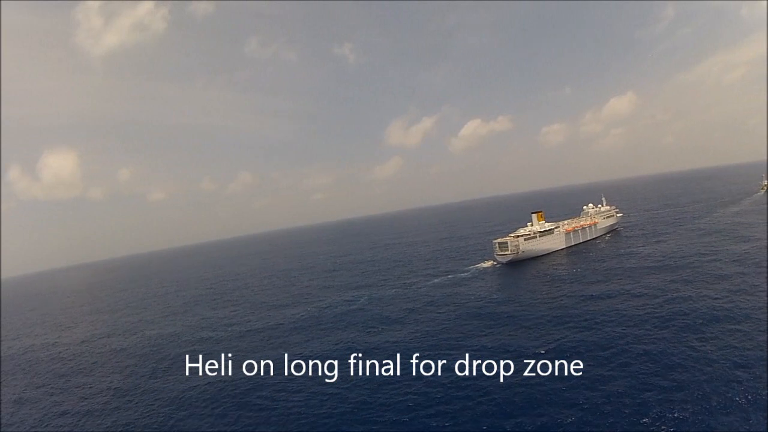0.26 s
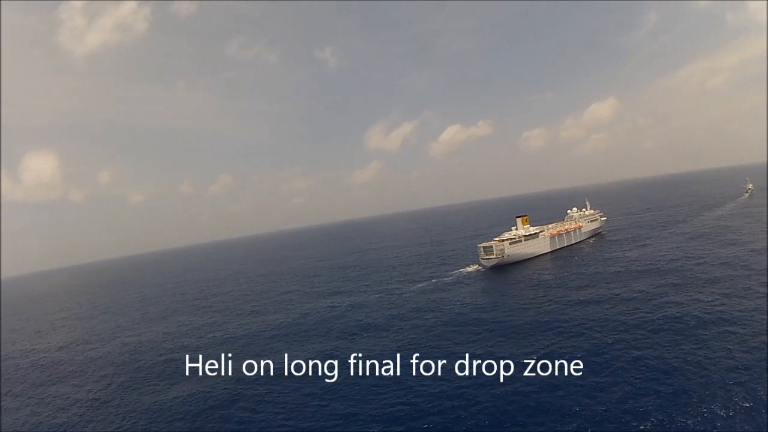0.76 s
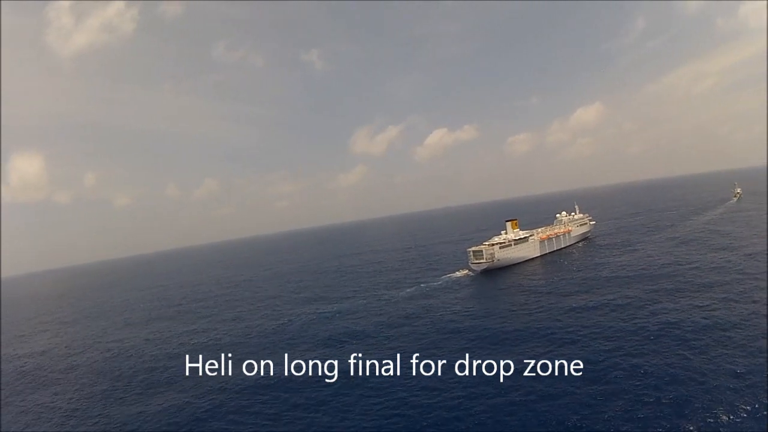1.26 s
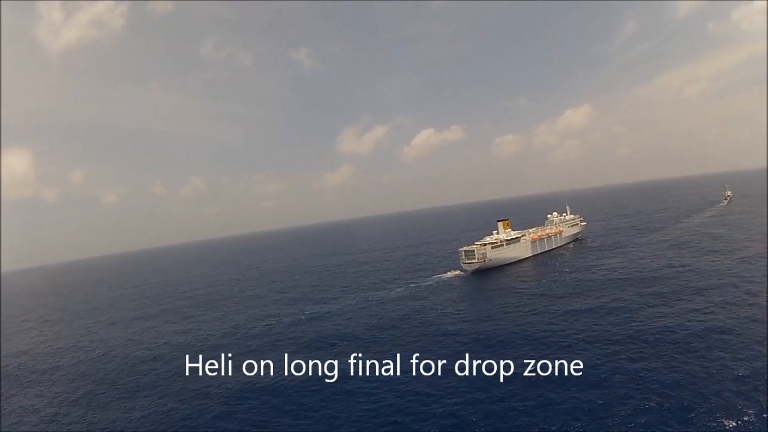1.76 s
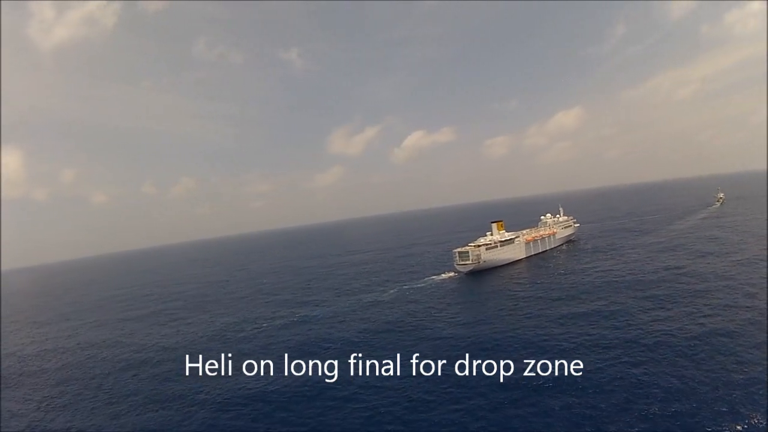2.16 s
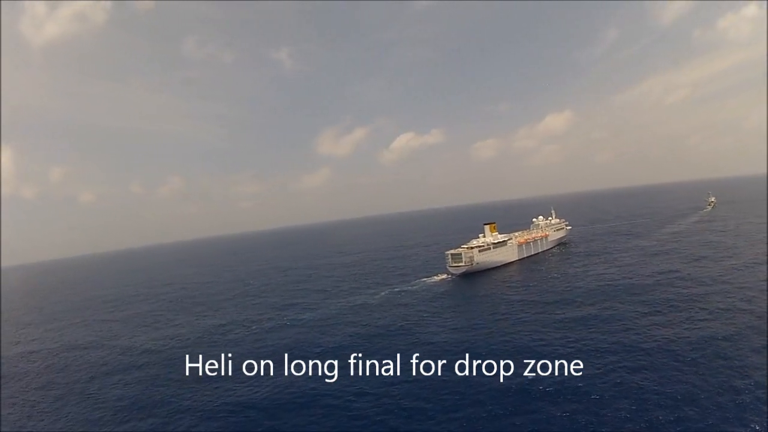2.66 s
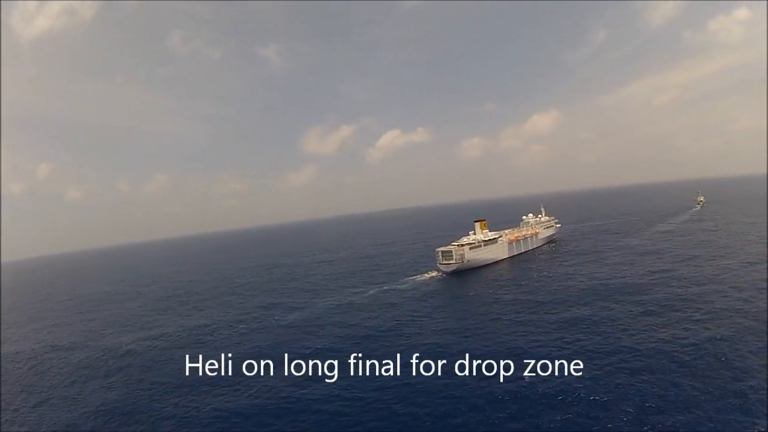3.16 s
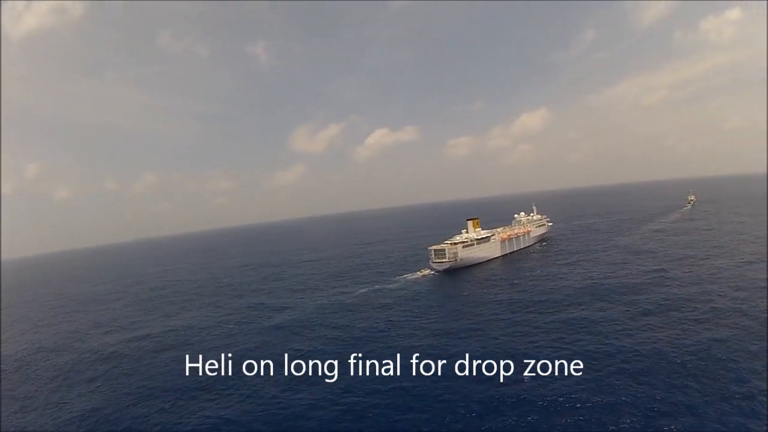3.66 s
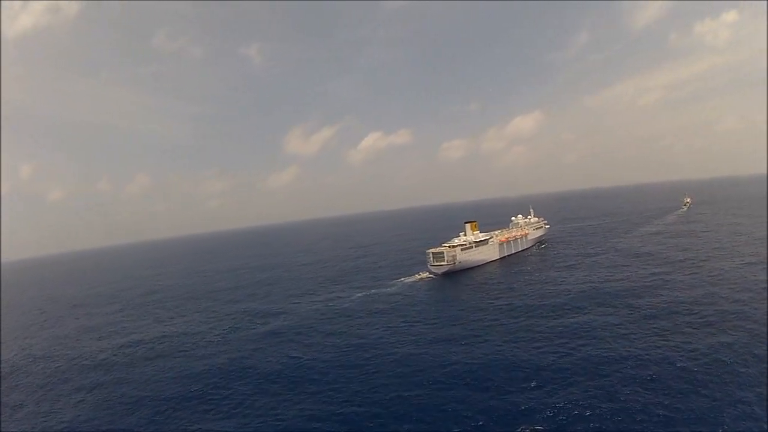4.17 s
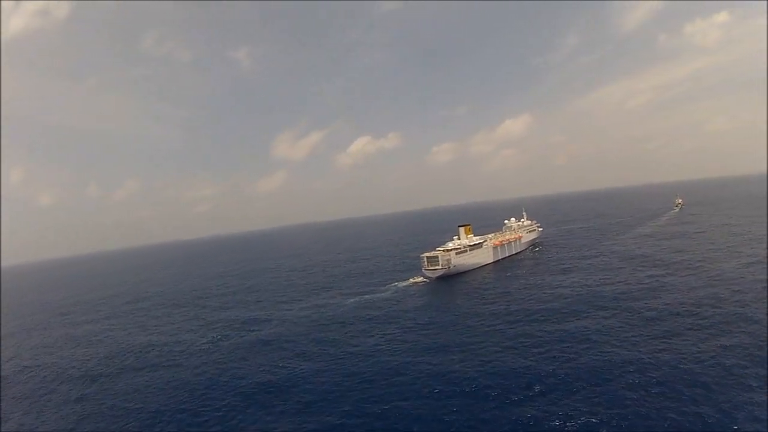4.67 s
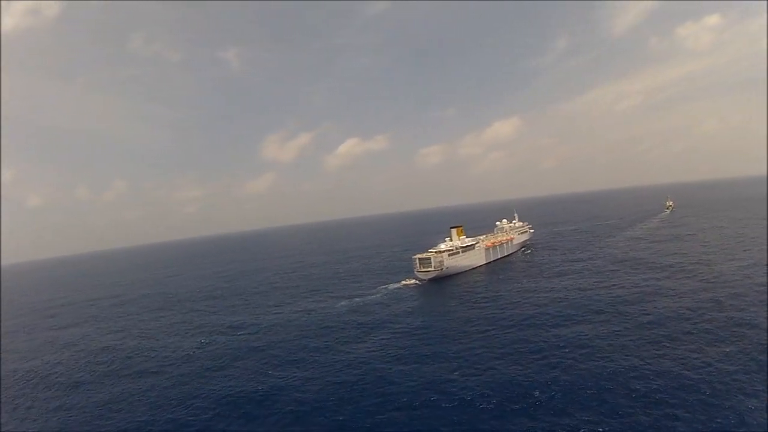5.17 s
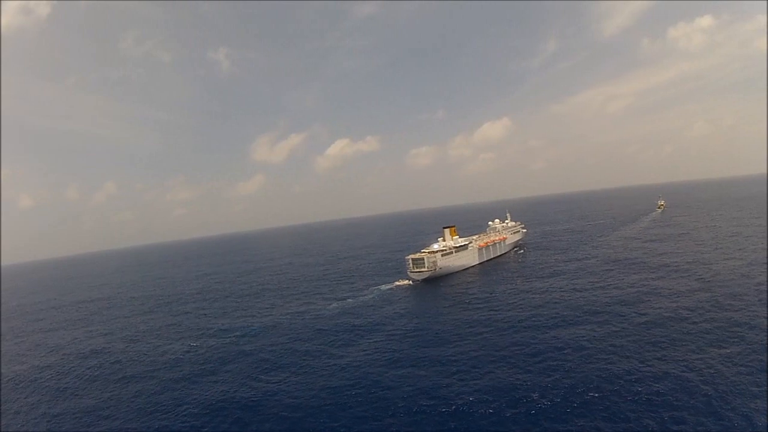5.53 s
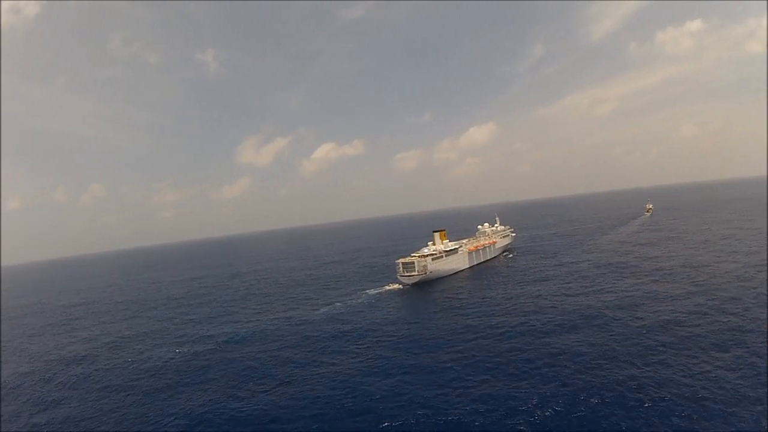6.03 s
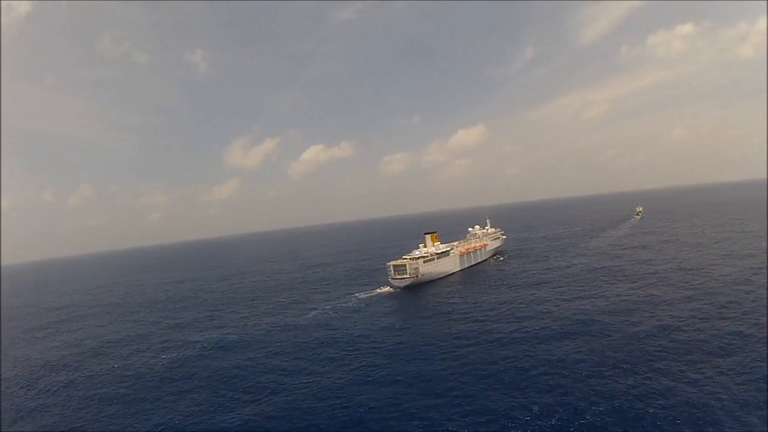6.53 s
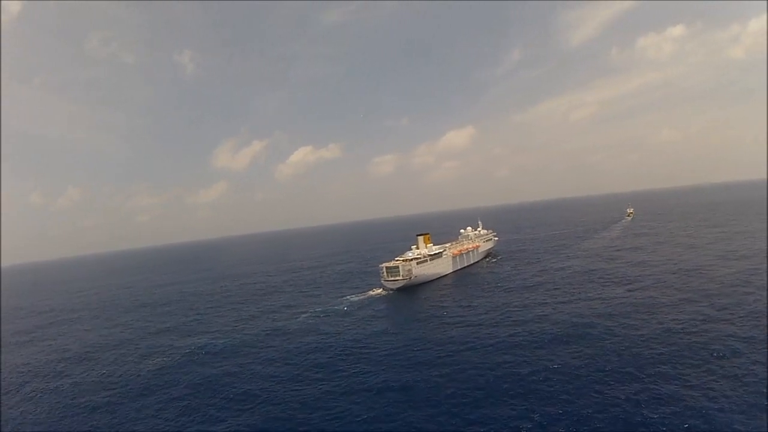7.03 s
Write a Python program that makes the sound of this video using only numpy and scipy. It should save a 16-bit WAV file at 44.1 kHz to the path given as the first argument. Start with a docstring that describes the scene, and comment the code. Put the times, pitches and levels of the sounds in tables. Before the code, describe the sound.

Continuous helicopter cabin noise: a dominant low hum with rapid rotor thudding, airframe vibration and rumbling buffeting. Over it lies a steady rush of air and turbine, chopped by quick, mostly rising swishes, with very faint gear tones inside. The boom wavers early, swells toward the middle and is strongest in the last second or so. Close, lo-fi mono pickup on board, no sea sounds.

```python
"""A three-bladed helicopter rotor thumps the cabin about 20 times a second, heard from inside in cruise over the sea.
The cabin booms on the fourth harmonic of the blade passages, made from wandering tones locked to the shaft.
Around it, shaped noise makes the buffeting and the roar of air and turbine, with mostly rising blade swishes.
Drive train tones hum faintly. A low-rate sample hold mirrors the whole mix into a gritty treble."""
import sys
import numpy as np
from scipy import signal
from scipy.fft import rfft, irfft, next_fast_len
from scipy.io import wavfile
from scipy.ndimage import map_coordinates

SR = 44100
rng = np.random.default_rng(int(sys.argv[2]) if len(sys.argv) > 2 else 0)


def unload_audio(sound):
    """Save the sound as a 16-bit wav file, at the path given as the first command line argument."""
    columns = np.transpose(np.atleast_2d(sound))
    # keep every value between -1 and 1, then stretch to whole-number steps
    steps = np.round(np.clip(columns, -1, 1) * 32767)
    wavfile.write(sys.argv[1], SR, steps.astype(np.int16))


N = 321930  # length in samples

# Drive train tones: pitch_hz, level_db
GEAR_TONES = [(49.6, -54), (253, -56), (338, -51), (730, -57.5), (1114, -63), (1697, -59.5)]
# Course of the air noise, before each layer's fixed trim: start_s, buffeting_db, rush_db
FLIGHT_LEVELS = [(0, -40.5, -35.6), (.7, -38, -36), (2, -39, -35), (2.75, -38, -34.3), (3.8, -38.5, -34.5),
                 (4.8, -39.5, -35), (5.8, -38, -35), (7.3, -37.5, -35)]
# Relative spectrum of the low cabin turbulence: pitch_hz, density_db (per Hz)
BUFFET_SPECTRUM = [(12, -31), (32, -25), (50, -14), (66, -4.5), (80, -5), (93, -6), (115, -10.5),
                   (150, -16), (200, -15.5), (240, -19), (270, -23.5), (325, -17), (400, -25), (600, -50)]
# Relative spectrum of the air and turbine roar: pitch_hz, density_db (per Hz)
RUSH_SPECTRUM = [(150, -26), (400, -9.5), (550, -0.5), (800, -1), (1050, -8), (1350, -7), (1600, -1),
                 (2200, -3.5), (2580, -3), (2950, -11), (3650, -13.5), (4400, -21), (5000, -27),
                 (5600, -26.5)]
# Cabin peaks and hollows in the roar: centre_hz, half_width_hz (to 1/e), change_db
CABIN_COLOUR = [(614, 26, 1), (653, 25.5, -7), (785, 61, 3), (1207, 70, 3), (1883, 63, -2.5), (2160, 95, 4),
                (2698, 68, -5), (3216, 225, -5.5)]
# Swishes in a blade passage, before blade bite and band levelling: moment (0-1 passage),
# half_length (passages, to 1/e), centre_hz, climb (octaves per passage), half_width (octaves, to 1/e), swell_db
BLADE_SWISHES = [(0.52, 0.4, 1515, 0.029, 0.18, 7.5), (0.85, 0.37, 2100, 0.44, 0.21, 10),
                 (0.97, 0.15, 1030, 0.33, 0.27, 6.5), (0.6, 0.13, 355, .8, 0.43, 13),
                 (0.7, 0.27, 4060, -0.51, 0.45, 7), (0.58, 0.27, 4720, 0.49, 0.081, 5),
                 (0.4, 0.03, 2570, 0, 0.33, 6.5)]
# Blade passage rate: start_s, rate_hz
PASSAGE_RATE = [(0, 20.323), (1, 20.31), (2, 20.27), (3, 20.258), (3.6, 20.238), (4.5, 20.296),
                (5.2, 20.266), (6, 20.257), (7.3, 20.293)]
# Slow course of the cabin boom: start_s, level_db
BOOM_COURSE = [(0, -19.5), (.45, -18), (1.15, -21.5), (2.75, -16.5), (4.1, -14.1), (5.25, -16),
               (5.82, -14.5), (5.98, -11.3), (7.3, -11.5)]
# Brief dips and swells of the boom: centre_s, change_db, half_length_s (to 1/e)
BOOM_SWINGS = [(0.584, -11, 0.042), (.81, -7.5, 0.043), (0.973, -14, .035), (1.36, -6, 0.13),
               (2.102, -12, 0.036), (3.4, 4, 0.034), (4.325, -4, 0.057), (5.095, -5, 0.04)]
# Blade pressure wave at cruise boom: harmonic (x passage rate), level_db
THUMP_HARMONICS = [(1, -41), (2, -25)]
# Airframe vibration at cruise boom: harmonic (x passage rate), level_db, unsteadiness (0-1)
SHAKE_HARMONICS = [(3, -31, 0.05), (5, -33.5, 0.51), (7, -45, 0.7), (8, -52, 1), (10, -48, 0.9),
                   (11, -56, 0.87)]
# Shaft orders that ring the cabin: order (x shaft rate), level_db (re boom), unsteadiness (0-1)
BOOM_ORDERS = [(8, -48, 1), (10, -19, 0.85), (11, -15.5, 0.67), (12, 0.5, 0), (13, -43, 0.6),
               (18, -22.5, 0), (27, -34.5, 0.7), (36, -36, 0.46), (45, -44, 0.83)]

FLUTTER_DB, FLUTTER_PER_S = .5, 11  # slight random unrest of the boom: scale, knots per second
CRUISE_DB = -15.5  # boom level at which thump and vibration have their listed strength
THUMP_FOLLOWS, SHAKE_FOLLOWS = 0.078, 0.4  # dB per dB of boom
INPUT_HZ, HOLD_HZ, TOP_HZ = 5700, 12000, 15300  # input band edge, hold rate, final cutoff


def amp(db):
    """Decibels to gain."""
    return 10 ** (np.asarray(db) / 20)


def unit(x):
    """x scaled to rms 1."""
    return x / np.sqrt(np.mean(np.abs(x) ** 2) + 1e-20)


def along(points, hz):
    """Spectrum points read on a log frequency axis."""
    point_hz, value = np.transpose(points)
    return np.interp(np.log(hz + 1), np.log(point_hz + 1), value)


def curves(rows):
    """One value per sample for each column after the time."""
    s, *columns = np.transpose(rows)
    return [np.interp(np.arange(N) / SR, s, column) for column in columns]


def wobble(rate):
    """A smooth random curve through normal knots, rate knots a second."""
    knots = rng.standard_normal(int(N * rate / SR) + 4)
    coarse = np.arange(0, N, 32)
    return np.interp(np.arange(N), coarse, map_coordinates(knots, [coarse * rate / SR]))


def filtered(x, response):
    """x shaped by a gain curve over frequency, with zero padding against wrap-around."""
    m = next_fast_len(N + SR // 2)
    spectrum = rfft(x, m) * response(np.fft.rfftfreq(m, 1 / SR))
    return irfft(spectrum, m)[:N]


def tone(cycles, unsteady, rate):
    """A tone of about rms 1 whose strength and phase wander around a steady part."""
    wander = (wobble(rate) + 1j * wobble(rate)) / np.sqrt(2)
    drift = unit(1 - unsteady + unsteady * wander)
    return np.sqrt(2) * np.real(drift * np.exp(2j * np.pi * cycles))


def gears():
    """Faint wavering tones of the drive train."""
    t = np.arange(N) / SR
    return sum(amp(db) * tone(hz * t, unsteady=0.37, rate=9) for hz, db in GEAR_TONES)


def buffeting(passages, buffet_db):
    """Downwash rumbles on the cabin as low noise, surging with each blade."""
    surge = amp(2.25 * np.cos(2 * np.pi * (passages - .18)))
    turbulence = rng.standard_normal(N) * surge
    rumble = filtered(turbulence, lambda hz: amp(along(BUFFET_SPECTRUM, hz)) * (hz < INPUT_HZ))
    return amp(buffet_db + 4.5) * unit(rumble)


def swish_gain(passages, frame_s, hz, lull_db=3, wander_octaves=0.076):
    """Passing blades swell moving bands of the roar and leave a lull; each band keeps its mean power."""
    def per_frame(curve):
        return np.interp(frame_s * SR, np.arange(N), curve)

    moment = per_frame(passages)

    def after(centre):
        """Passages elapsed since the nearest centre, -0.5 to 0.5."""
        return (moment - centre + .5) % 1 - .5

    # no two swishes sit at quite the same pitch
    octave = np.log2(hz + 1)[:, None] + wander_octaves * per_frame(wobble(20))
    swell_db = np.zeros(octave.shape)
    for centre, length, mid_hz, climb, width, db in BLADE_SWISHES:
        since = after(centre)
        off_pitch = octave - np.log2(mid_hz) - climb * since
        swell_db += db * np.exp(-(since / length) ** 2 - (off_pitch / width) ** 2)
    # one blade of the three bites a little harder
    bite = 1 + .11 * np.cos(2 * np.pi * moment / 3)
    # the roar ducks between one blade and the next
    lull = np.exp(-(after(.15) / .12) ** 4)
    gain = amp(swell_db * bite - lull_db * lull)
    return gain / np.sqrt(np.mean(gain ** 2, axis=1, keepdims=True))


def cabin_db(hz):
    """Cabin resonances lift and hollow out parts of the roar."""
    return sum(db * np.exp(-((hz - centre_hz) / width) ** 2) for centre_hz, width, db in CABIN_COLOUR)


def rush(passages, rush_db, blade_scatter_db=0.31, grit_db=1.24):
    """Broadband roar of air and turbine, swept by blade swishes and coloured by the cabin."""
    hz, frame_s, noise = signal.stft(rng.standard_normal(N), SR, nperseg=256, noverlap=192)
    swept = noise * swish_gain(passages, frame_s, hz)
    air = signal.istft(swept, SR, nperseg=256, noverlap=192)[1][:N]
    # slower scatter and fast grit in the level
    air = air * amp(blade_scatter_db * wobble(25) + grit_db * wobble(500))
    roar = filtered(air, lambda f: amp(along(RUSH_SPECTRUM, f) + cabin_db(f)))
    return amp(rush_db + 0.87) * unit(roar)


def boom_level():
    """Cabin boom level in dB: a slow course, brief bell-shaped dips and swells, and a slight flutter."""
    t = np.arange(N) / SR
    swings = sum(db * np.exp(-((t - s) / length) ** 2) for s, db, length in BOOM_SWINGS)
    return curves(BOOM_COURSE)[0] + swings + FLUTTER_DB * wobble(FLUTTER_PER_S)


def rotor(passages):
    """Each blade shakes the airframe, then its pressure wave arrives; unequal blades make the boom throb."""
    thump = sum(amp(db) * tone(k * (passages - .5), 0, rate=1) for k, db in THUMP_HARMONICS)
    jolt = passages - .25  # a quarter passage ahead of the thump
    shake = sum(amp(db) * tone(k * jolt, unsteady, rate=2.935) for k, db, unsteady in SHAKE_HARMONICS)
    shaft = jolt / 3  # three blades to a turn
    boom = sum(amp(db) * tone(k * shaft, unsteady, rate=2.987) for k, db, unsteady in BOOM_ORDERS)
    boom_db = boom_level()
    # thump and vibration grow with the boom
    load_db = boom_db - CRUISE_DB
    thump = amp(THUMP_FOLLOWS * load_db) * thump
    shake = amp(SHAKE_FOLLOWS * load_db) * shake
    return thump + shake + amp(boom_db) * boom


def scene():
    """All cabin sources summed, with thump, boom, buffeting and swishes locked to one rotor."""
    passages = np.cumsum(curves(PASSAGE_RATE)[0]) / SR
    buffet_db, rush_db = curves(FLIGHT_LEVELS)
    background = gears() + buffeting(passages, buffet_db) + rush(passages, rush_db)
    return (background + rotor(passages))[None]


def record(dry):
    """Holding each sample mirrors the narrow input band on both sides of the hold rate; hiss is added."""
    narrow = filtered(dry[0], lambda hz: 1 / (1 + (hz / INPUT_HZ) ** 80))
    # sampling keeps the band and adds its mirror images around HOLD_HZ
    sampled = narrow * (1 + 2 * np.cos(2 * np.pi * HOLD_HZ * np.arange(N) / SR))
    # the hold's sinc response dulls the images
    held = filtered(sampled, lambda hz: np.sinc(hz / HOLD_HZ))
    hiss = amp(-60.5) * rng.standard_normal(N)
    return filtered(held + hiss, lambda hz: hz < TOP_HZ)[None]


dry = scene()
out = record(dry)
unload_audio(out)
```